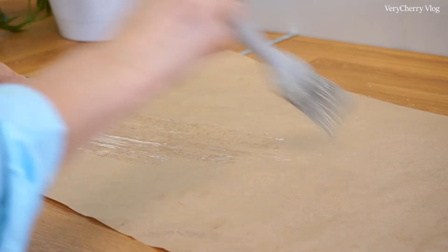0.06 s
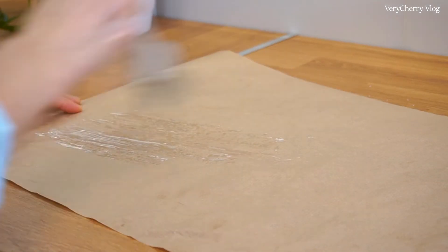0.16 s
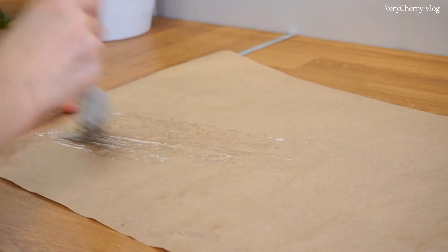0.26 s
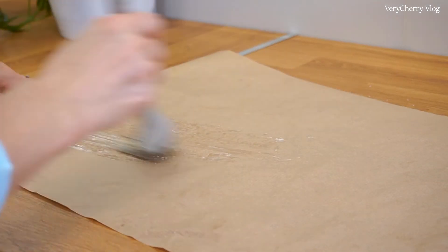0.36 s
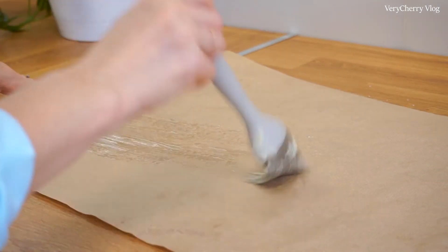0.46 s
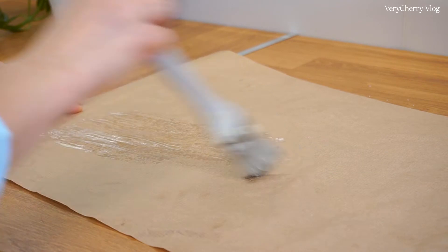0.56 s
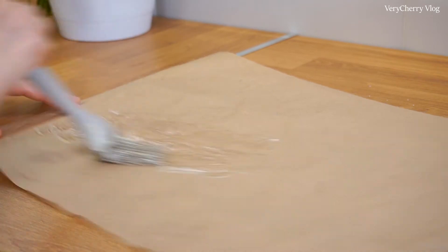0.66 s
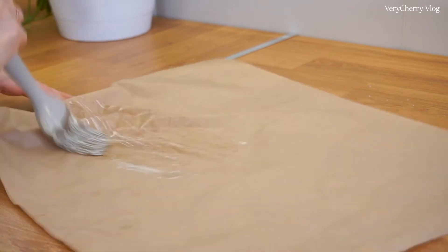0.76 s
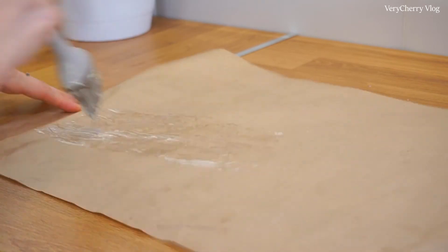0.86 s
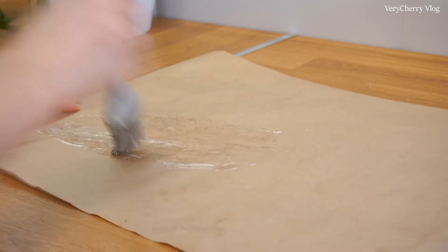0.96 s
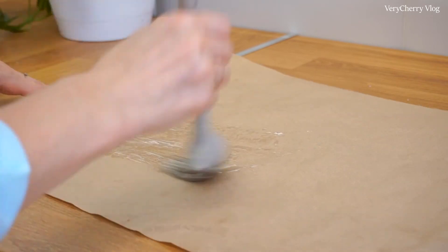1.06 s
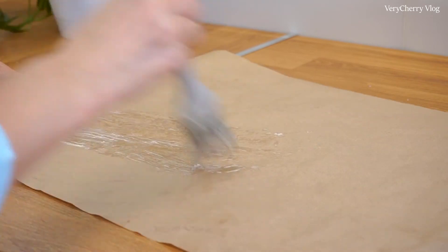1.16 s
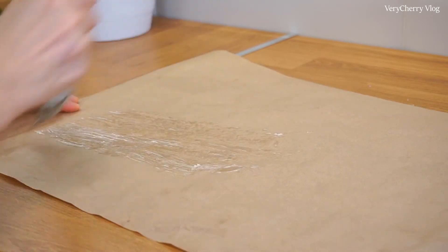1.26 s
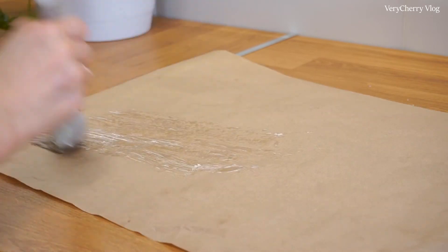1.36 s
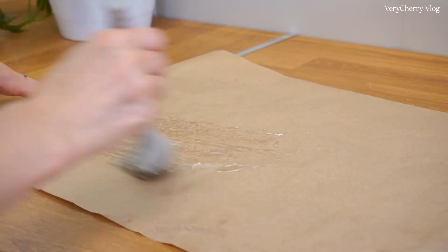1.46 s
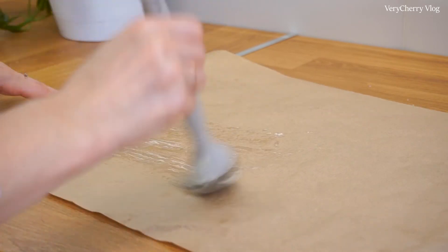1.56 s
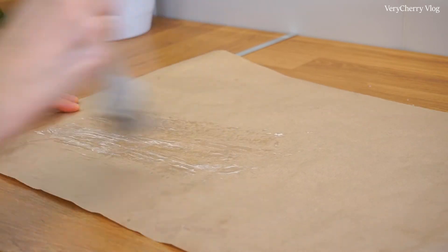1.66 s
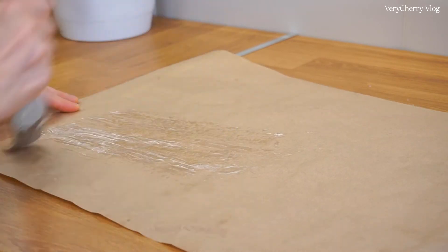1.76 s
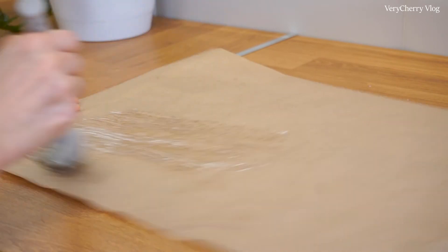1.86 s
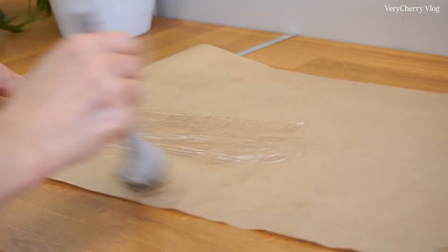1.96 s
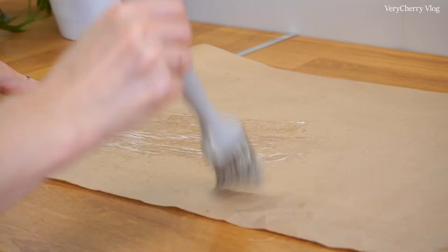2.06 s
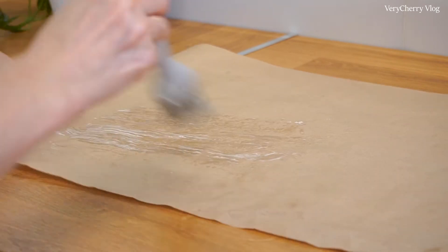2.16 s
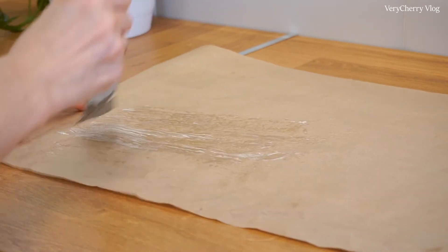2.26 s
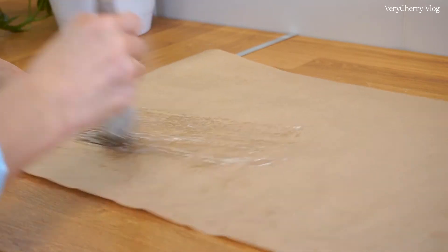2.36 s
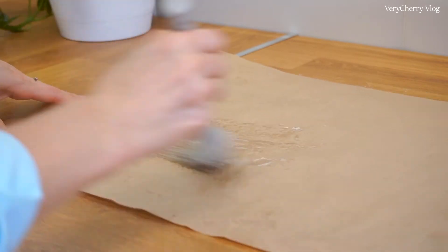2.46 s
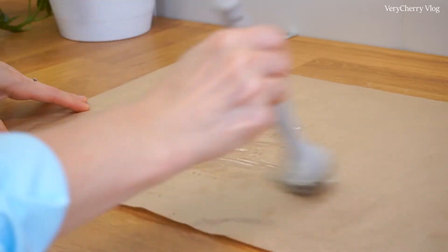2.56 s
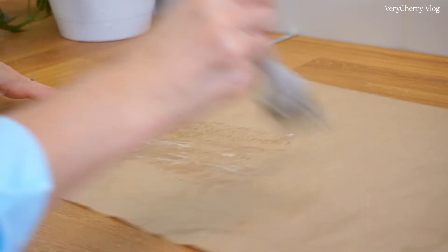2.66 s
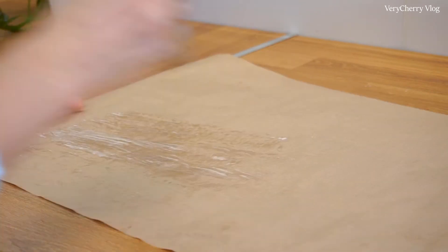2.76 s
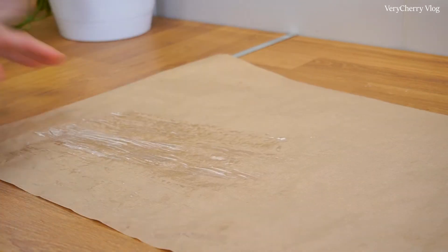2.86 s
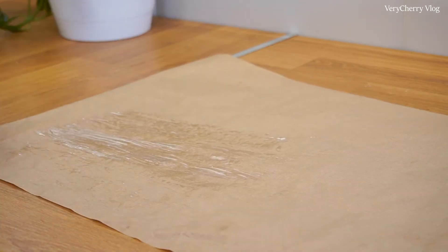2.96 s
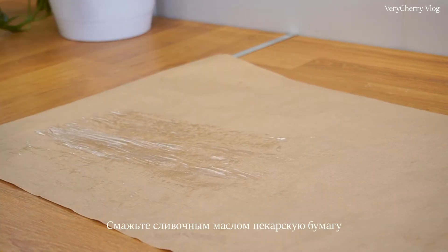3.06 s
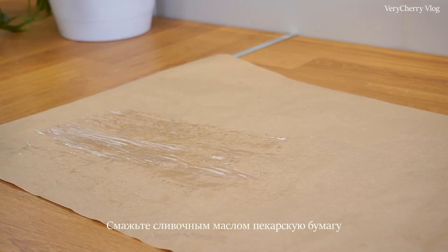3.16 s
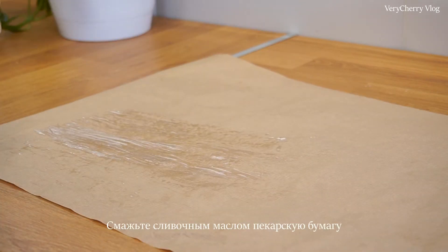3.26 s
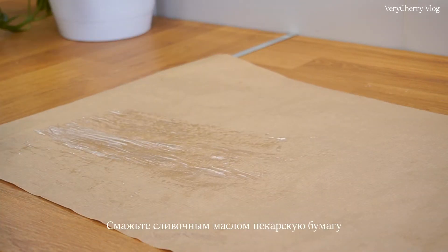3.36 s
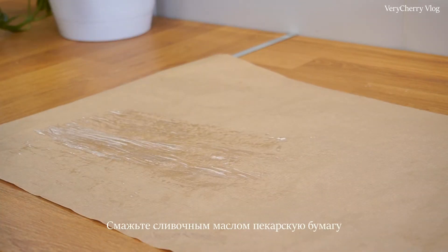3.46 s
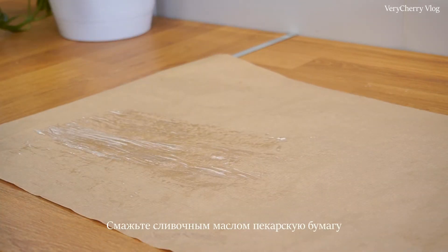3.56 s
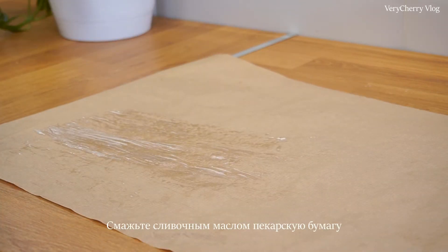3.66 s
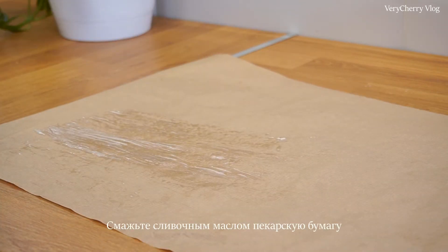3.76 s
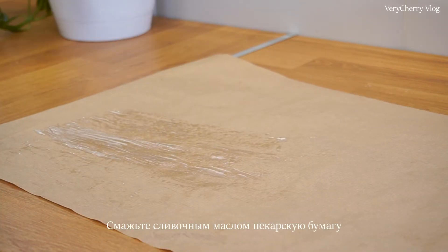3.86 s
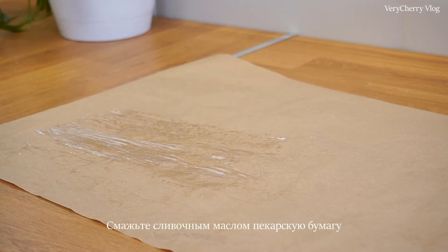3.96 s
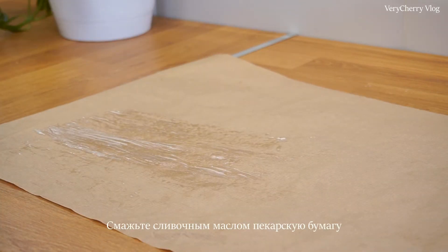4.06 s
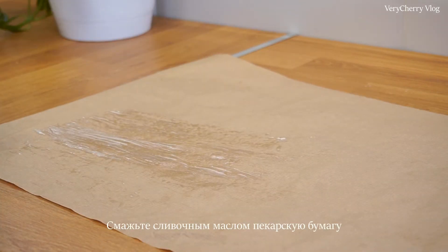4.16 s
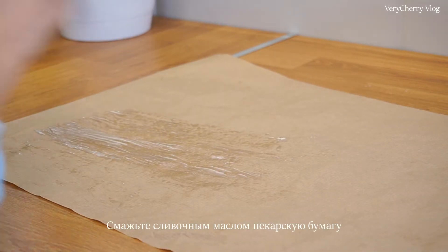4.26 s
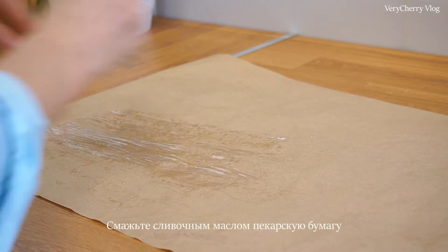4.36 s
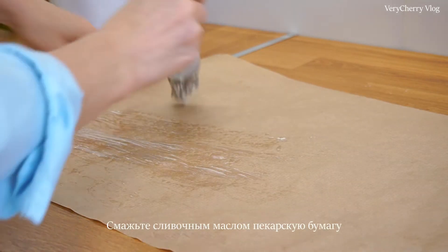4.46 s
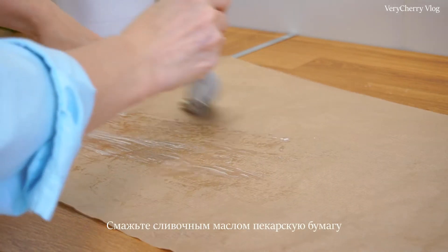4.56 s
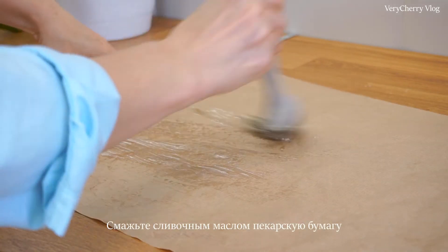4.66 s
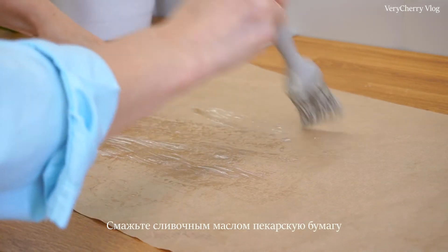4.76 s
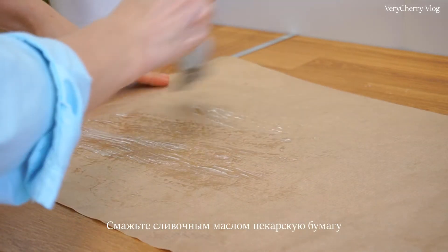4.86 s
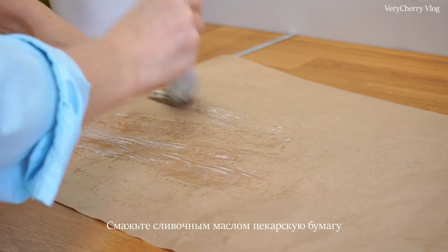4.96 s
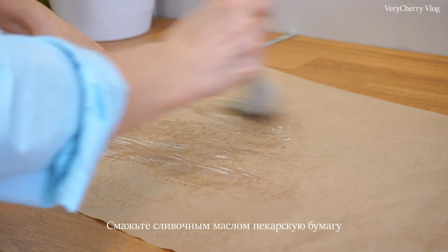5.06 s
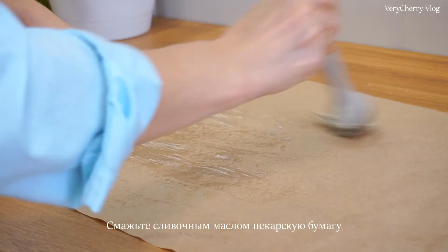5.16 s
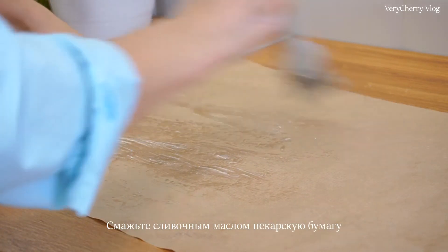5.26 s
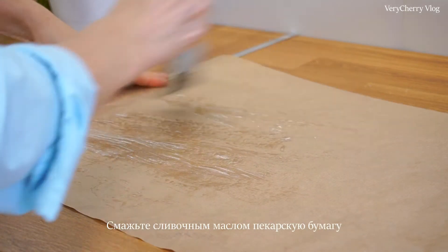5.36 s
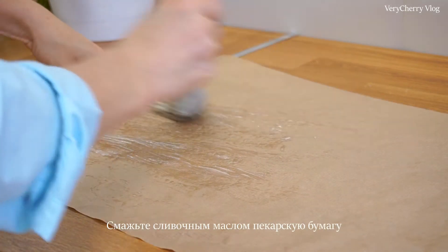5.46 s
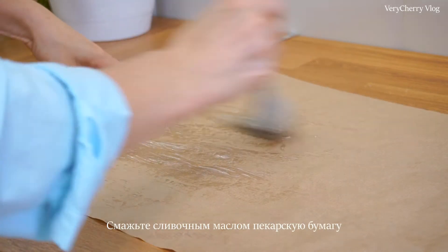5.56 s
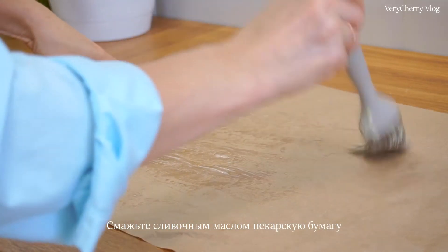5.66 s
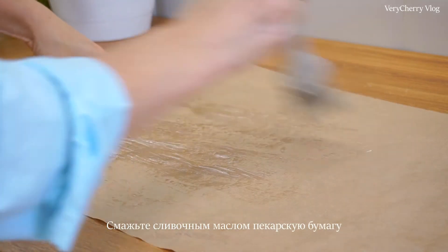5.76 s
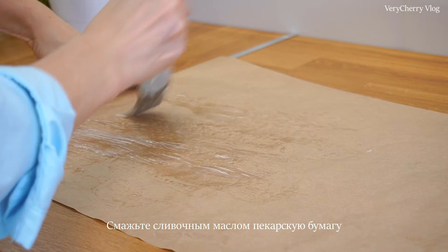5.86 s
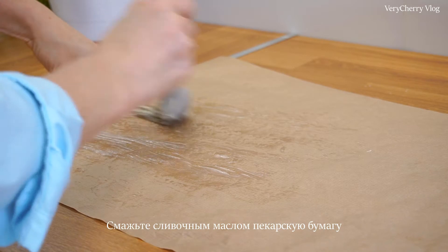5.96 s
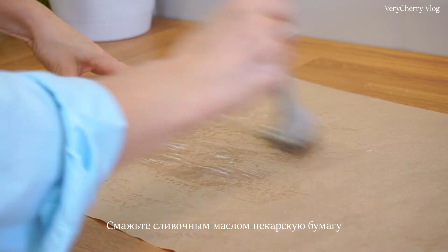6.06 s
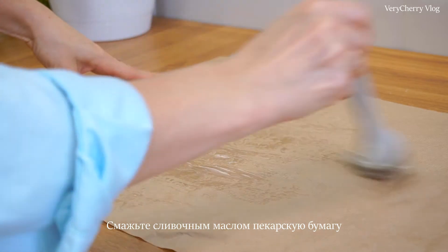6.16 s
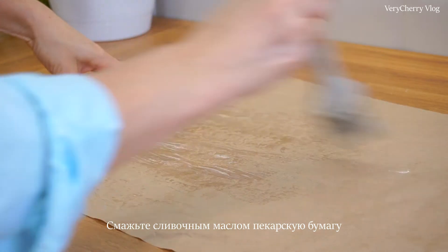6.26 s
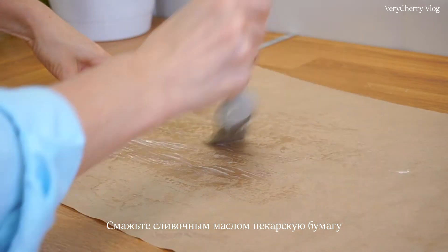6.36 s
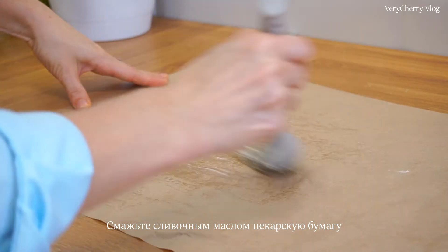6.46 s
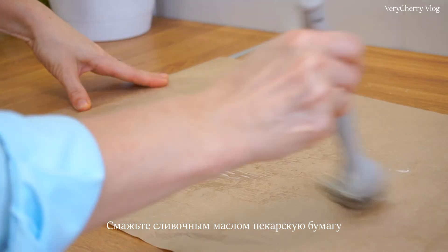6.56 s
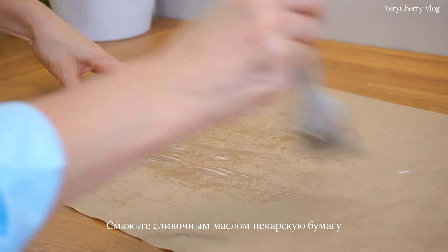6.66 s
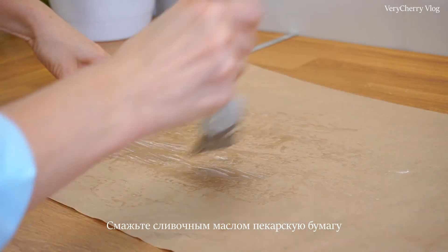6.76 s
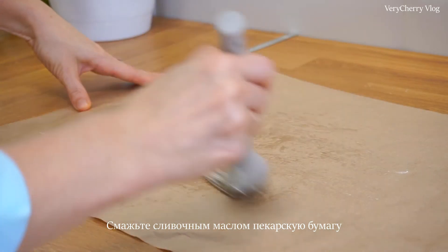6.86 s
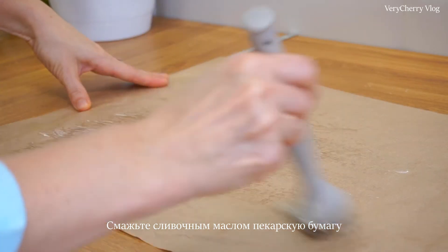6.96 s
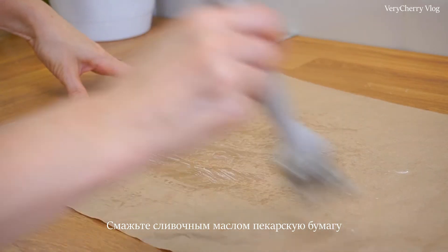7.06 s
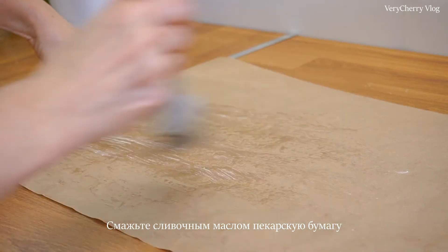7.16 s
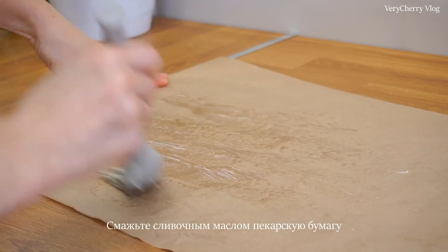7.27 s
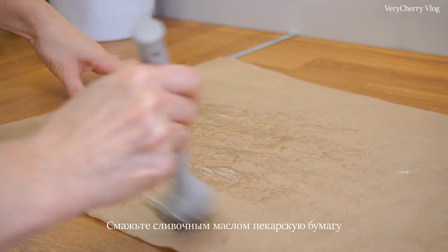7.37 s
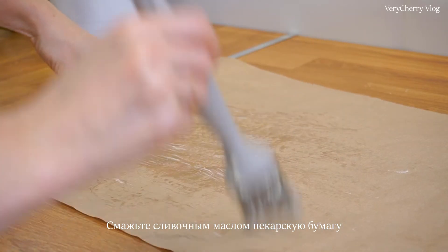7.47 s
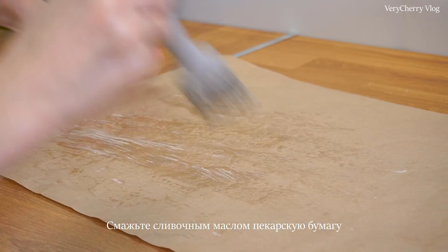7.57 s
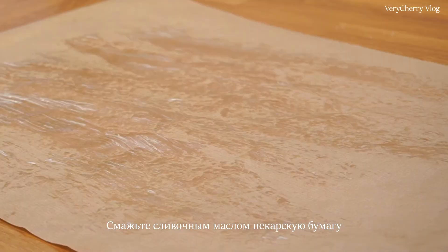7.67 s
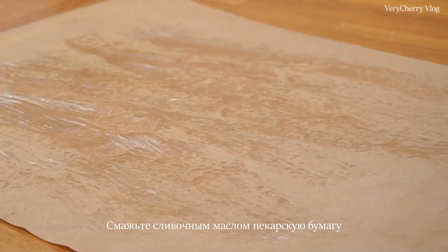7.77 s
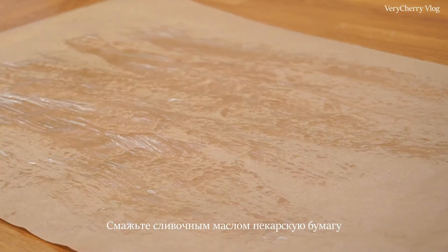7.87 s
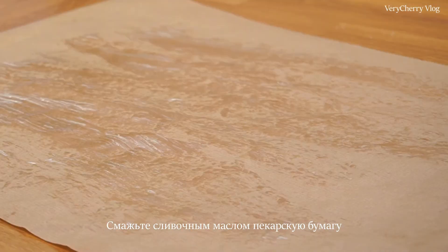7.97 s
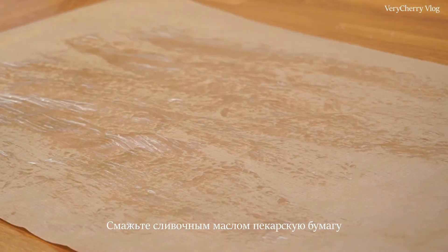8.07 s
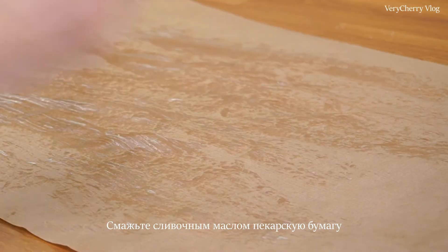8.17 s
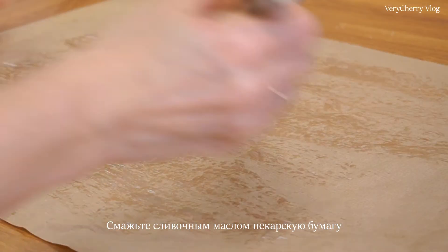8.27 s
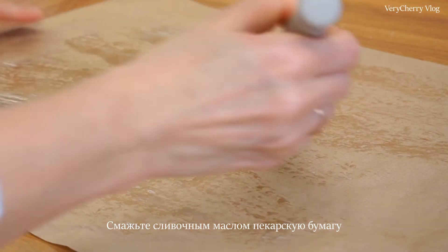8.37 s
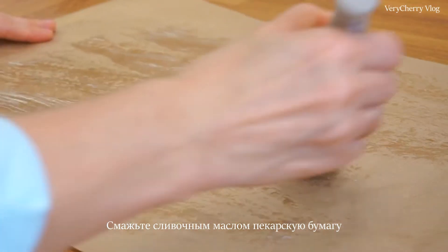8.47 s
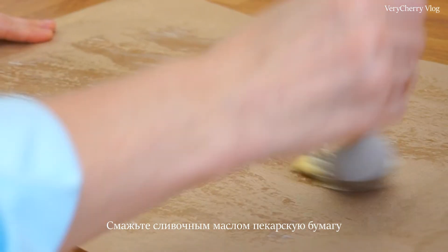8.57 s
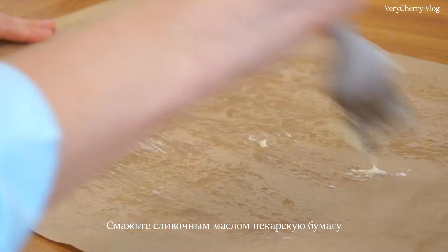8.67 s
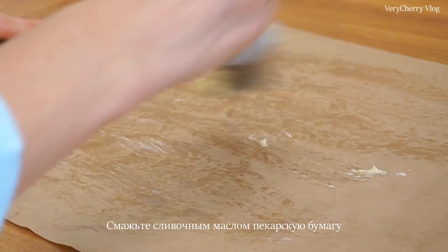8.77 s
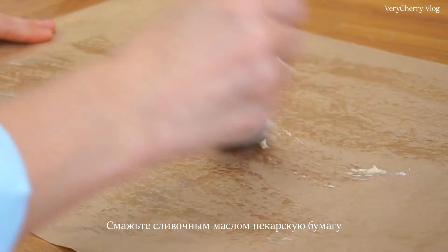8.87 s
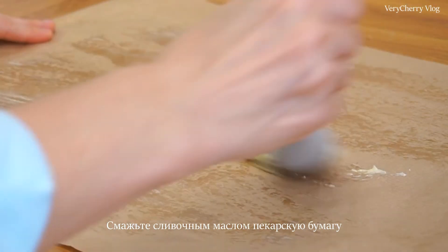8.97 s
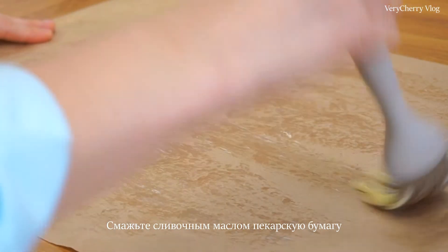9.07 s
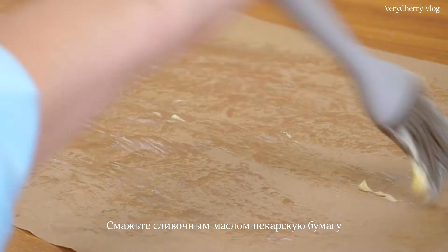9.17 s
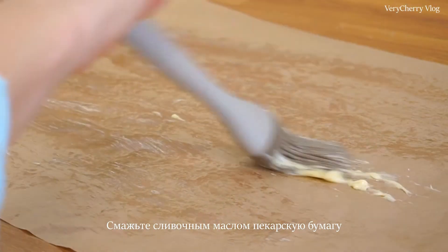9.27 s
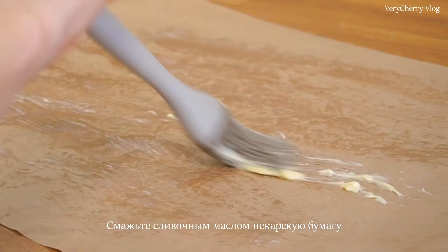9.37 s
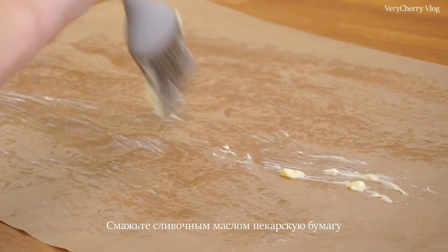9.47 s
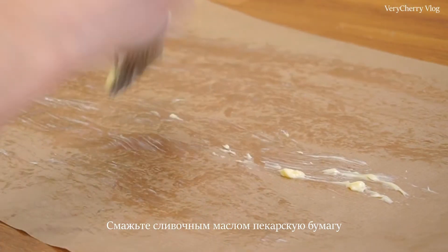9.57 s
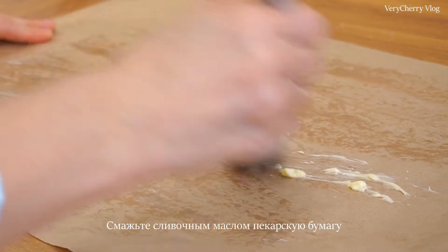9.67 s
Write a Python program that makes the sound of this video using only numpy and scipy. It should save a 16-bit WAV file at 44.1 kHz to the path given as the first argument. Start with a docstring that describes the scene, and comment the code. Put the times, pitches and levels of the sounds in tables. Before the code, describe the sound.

Close stereo pickup in a small kitchen: a soft brush scrapes butter over baking paper in quick uneven strokes, with sharp crisp paper snaps. After about three seconds it pauses; a faint hollow knock and a bright dish tap sound. Then the strokes resume, with soft wooden counter thumps. The room ringing cuts off abruptly near 7.7 seconds, and after a short quiet gap firmer scrapes return.

```python
"""Soft bristles scrape butter over baking paper: clumps of noise slips, shaped in level and tone by each push.
The paper snaps in sharp clicks with showers of smaller ones; near surfaces echo them and a small kitchen rings on.
The wooden counter thumps in two low modes; a dish tap and a hollow knock ring, a faint squeak glints.
Soft low bumps and a lumpy room tone lie under it all. At 7.68 s the ringing of the room stops short."""
import sys
import numpy as np
from scipy import signal
from scipy.fft import rfft, irfft, next_fast_len
from scipy.io import wavfile
from scipy.ndimage import uniform_filter1d, map_coordinates

SR = 44100
rng = np.random.default_rng(int(sys.argv[2]) if len(sys.argv) > 2 else 0)


def log_audio(samples):
    """Write samples as a 16-bit WAV file to the path given in sys.argv[1]."""
    # one column per channel
    frames = np.atleast_2d(samples).T
    # limit to full scale, then quantise
    limited = np.clip(frames, -1, 1)
    pcm = np.round(limited * 32767).astype(np.int16)
    wavfile.write(sys.argv[1], SR, pcm)


N = 428211


def amp(db):
    """dB to gain."""
    return 10 ** (np.asarray(db) / 20)


def unit(x):
    """x at rms 1."""
    return x / np.sqrt(np.mean(x ** 2) + 1e-20)


def along(points, hz):
    """Read (f/Hz, value) points on a log frequency axis."""
    f, value = np.transpose(points)
    return np.interp(np.log(hz + 1), np.log(f + 1), value)


def wobble(rate):
    """A smooth random curve, rate knots a second."""
    knots = rng.standard_normal(int(N * rate / SR) + 4)
    return map_coordinates(knots, [np.arange(N) * rate / SR])


def filtered(x, response):
    """x through a filter given as a function of frequency."""
    size = next_fast_len(N + SR // 2)
    gain = response(np.fft.rfftfreq(size, 1 / SR))
    return irfft(rfft(x, size) * gain, size)[..., :N]


def add(track, s, sound):
    """Mix a sound in at time s."""
    part = track[..., max(round(s * SR), 0):][..., :sound.shape[-1]]
    part += sound[..., :part.shape[-1]]


def ringing(modes, blur, rise):
    """Dying modes; a rattling contact blurs each one with a wandering phase."""
    t = np.arange(SR // 2) / SR
    wander = blur * np.cumsum(rng.standard_normal((len(modes), len(t))), axis=1)
    ring = np.zeros(len(t))
    for (hz, db, t60), phase in zip(modes, wander):
        ring += amp(db - 60 * t / t60) * np.sin(2 * np.pi * hz * t + phase)
    return ring * (1 - np.exp(-t / rise))


# spectrum of the room tone: (f/Hz, relative level/dB per Hz)
AIR_SPECTRUM = [(12, -55), (20, -12.5), (95, -5.5), (123, -7), (158, -6.5), (284, -7), (317, -11),
                (620, -13.5), (674, -13), (891, -15.5), (1510, -18), (1950, -19.5), (2180, -20.5),
                (15800, -31)]
# likeness of the room tone at left and right: (f/Hz, correlation)
AIR_LIKENESS = [(60, 0.87), (130, 0.93), (290, 0.61), (640, 0), (1410, -0.0), (3100, 0.042), (6820, 0.061),
                (15000, 0.041)]
AIR_DB, AIR_DRIFT_DB = -55.5, 1  # level and its slow drift


def room_tone(patchy_db=3):
    """Low lumpy hum of the house, alike at both ports, under unrelated hiss."""
    hz, t, z = signal.stft(rng.standard_normal((2, N)), SR, nperseg=2048)
    patches = uniform_filter1d(rng.standard_normal(z.shape[1:]), size=2, axis=0)
    patches = unit(uniform_filter1d(patches, size=12, axis=1))
    depth = 1 / (1 + hz / 400)[:, None]  # the patches are deepest in the bass
    pair = signal.istft(z * amp(patchy_db * depth * patches), SR, nperseg=2048)[1][:, :N]

    def mid_side_gain(hz):
        turn = np.arccos(np.clip(along(AIR_LIKENESS, hz), -1, 1)) / 2
        return amp(along(AIR_SPECTRUM, hz)) * [np.cos(turn), np.sin(turn)]

    mid, side = filtered(pair, mid_side_gain)
    return amp(AIR_DB + AIR_DRIFT_DB * wobble(1.46)) * unit(np.array([mid + side, mid - side]))


# near echoes: (mean delay t/s, level/dB)
NEAR_ECHOES = [(.0026, -13), (.0073, -5.5), (.0146, -8), (.022, -14)]
# decay of the kitchen's diffuse tail: (f/Hz, t60/s)
KITCHEN_DECAY = [(200, 0.39), (1500, 0.62), (5000, 0.47), (15000, 0.17)]


def kitchen(x, tail_db=-5):
    """Near surfaces echo once, their paths shifting as the brush travels; the diffuse tail changes too."""
    out = np.zeros((2, N))
    for delay, db in NEAR_ECHOES:
        for port in range(2):
            late = (delay + .00025 * wobble(14)) * SR
            out[port] += amp(db) * map_coordinates(x[port], [np.arange(N) - late])
    step = SR // 5  # a new tail every 0.2 s
    for start in range(0, N, step):
        hz, t, z = signal.stft(rng.standard_normal((2, SR * 3 // 5)), SR, nperseg=256)
        decay = amp(-60 * t / along(KITCHEN_DECAY, hz)[:, None])
        tail = signal.istft(z * decay, SR, nperseg=256)[1]
        tail = tail / np.linalg.norm(tail[0])
        piece = x[:, start:start + step].mean(0)[None]
        wet = signal.fftconvolve(piece, tail, axes=1)
        wet += 0.12 * wet[::-1]  # the ports are close enough to share part of the tail
        add(out, start / SR + 0.0036, amp(tail_db) * wet)
    return out


# soft low bumps: (t/s, level/dB, f/Hz)
LOW_BUMPS = [(0.029, -73, 70.0), (0.329, -47.5, 48.4), (1.599, -56.5, 58.7), (2.299, -57, 69.5),
             (7.799, -55.5, 45.8), (9.549, -64, 47.6)]


def bumps():
    """Low sines swell softly and die away, one swell each."""
    out, t = np.zeros(N), np.arange(SR // 3) / SR
    for s, db, hz in LOW_BUMPS:
        swell = t / 0.033 * np.exp(1 - t / 0.028)
        add(out, s, amp(db) * swell * np.sin(2 * np.pi * hz * t))
    return out


# thumps of the worktop: (t/s, level/dB, upper mode level/dB relative to the lower)
COUNTER_THUMPS = [(2.306, -52, -8), (5.025, -55, -17), (5.142, -47, -5.5), (5.635, -48.5, -3.5),
                  (8.411, -60, 6.5), (8.903, -48, -7), (9.679, -52, -15)]
# lower and upper mode of the worktop: (f/Hz, t60/s)
COUNTER_MODES = [(90, 0.48), (340, 0.48)]


def counter():
    """Firm strokes push the worktop softly into its low modes."""
    out, t = np.zeros(N), np.arange(SR // 2) / SR
    (low_hz, low_t60), (high_hz, high_t60) = COUNTER_MODES
    onset = 1 - np.exp(-t / 0.0029)
    for s, db, upper_db in COUNTER_THUMPS:
        low = amp(-60 * t / low_t60) * np.sin(2 * np.pi * low_hz * t)
        high = amp(upper_db - 60 * t / high_t60) * np.sin(2 * np.pi * high_hz * t)
        add(out, s, amp(db) * onset * (low + high))
    return out


# the tap: (t/s, level/dB)
DISH_TAP = (3.524, -31.5)
# modes of the dish: (f/Hz, level/dB, t60/s)
DISH_MODES = [(1400, -12, .02), (2200, -13, .025), (3235, -11, .07), (3360, -12, .06), (5900, -9, .04),
              (8520, -9, .04)]


def dish_tap():
    """A tap sets the short bright modes of a dish ringing, blurred by the contact."""
    out = np.zeros(N)
    s, db = DISH_TAP
    add(out, s, amp(db) * ringing(DISH_MODES, blur=.14, rise=.0005))
    return out


# the knock: (t/s, level/dB)
HOLLOW_KNOCK = (3.222, -43)
# modes of the hollow body: (f/Hz, level/dB, t60/s)
HOLLOW_MODES = [(127, -8.5, 0.19), (253, -8, 0.16), (362, -1.5, 0.22), (397, 0.5, 0.1), (580, -10, 0.1),
                (687, -3.5, 0.089), (1065, -6, 0.066), (1400, -4, 0.081)]


def knock():
    """A hollow knock rings lower modes with a softer onset."""
    out = np.zeros(N)
    s, db = HOLLOW_KNOCK
    add(out, s, amp(db) * ringing(HOLLOW_MODES, blur=.07, rise=.006))
    return out


# swell of the squeak: (t/s, level/dB)
SQUEAK_SWELL = [(7.87, -85), (7.9, -73), (7.933, -64), (7.95, -74), (8.05, -83)]
# its harmonics: (multiple of the fundamental, level/dB)
SQUEAK_HARMONICS = [(1, -13), (2, 0), (3, -6), (4, -9)]
SQUEAK_HZ = 1848


def squeak():
    """A thin harmonic tone whose pitch trembles and whose harmonics flicker."""
    t = np.arange(N) / SR
    s, level = np.transpose(SQUEAK_SWELL)
    db = np.interp(t, s, level)
    phase = 2 * np.pi * np.cumsum(SQUEAK_HZ * (1 + .003 * wobble(60))) / SR
    tone = np.zeros(N)
    for multiple, harmonic_db in SQUEAK_HARMONICS:
        tone += amp(db + harmonic_db + 3.1 * wobble(40)) * np.sin(multiple * phase)
    return tone * ((t > s[0]) & (t < s[-1]))


def push(row, t):
    """Level of one scrape in dB at times t: rise, hold, fall."""
    s, db, rise, hold, fall = row[:5]
    before = np.clip(s - t, 0, None)
    after = np.clip(t - s - hold, 0, None)
    return db - 20 * before / max(rise, 1e-3) - 20 * after / max(fall, 1e-3)


# chance snaps: slots a second, level at a -39 dB scrape, usual pitch
CRACKLE_PER_S, CRACKLE_DB, CRACKLE_HZ = 15, -36, 6000
CRACKLE_GROWS = 0.77  # dB more for each dB of scrape over -40; one for one below


def crackle():
    """Small snaps at chance times over the first 8 s, as strong as the scrape allows."""
    s = (np.arange(120) + rng.random(120)) / CRACKLE_PER_S
    size, pitch, pan = rng.standard_normal((3, len(s)))
    scrape_db = np.max([push(row, s) for row in SCRAPES], axis=0)
    growth = np.where(scrape_db > -40, CRACKLE_GROWS, 1)
    db = CRACKLE_DB + growth * (scrape_db + 39) + 3 * size
    hz = np.clip(CRACKLE_HZ * np.exp(.35 * pitch), 2e3, 13e3)
    return [row for row in zip(s, db, hz, 4 * pan) if row[0] < N / SR]


# the clear paper snaps: (t/s, level/dB, centre f/Hz, left over right level/dB)
PAPER_SNAPS = [(0.018, -26.5, 6730, -2.5), (0.164, -34.5, 5600, 0), (0.331, -25.5, 7080, 2),
               (0.448, -28, 6260, -2.0), (0.6337, -29, 4890, 1.5), (0.6507, -15, 7930, 0),
               (0.6693, -24, 6240, -7), (0.7242, -17, 4910, 1), (0.825, -22, 4680, 0.0),
               (0.884, -18, 5190, -1.0), (1.067, -15, 6260, -0.5), (1.3476, -30.5, 4420, -1),
               (1.4739, -18.5, 6000, -4), (1.4797, -15, 6680, -0.5), (1.5424, -19.5, 7600, -1.0),
               (1.6566, -27, 5630, 0.0), (1.801, -31.5, 7200, 2), (1.837, -26, 7320, -1),
               (1.8628, -17.5, 9370, -2.0), (1.9113, -25, 5950, 7), (2.0486, -17, 6860, -1.5),
               (2.069, -22, 6870, -1.5), (2.138, -29.5, 4770, -7), (2.2014, -14.5, 9560, 1),
               (2.2845, -15, 7220, 1), (2.4896, -27, 5960, -3), (2.536, -21, 6410, 1),
               (2.819, -24.5, 9140, -3), (3.0783, -30, 3550, 1), (3.495, -40, 5290, -3),
               (3.5231, -17, 8000, -2), (4.5215, -25.5, 2570, 4), (4.576, -17, 4720, -1.0),
               (4.706, -20, 10200, -5), (4.7434, -23, 3340, 2), (4.9641, -18.5, 7440, -0.5),
               (5.0717, -23.5, 5880, -5), (5.0948, -21, 9230, -2.5), (5.108, -23, 9500, -4),
               (5.123, -28, 3390, -3.0), (5.5048, -21, 12200, -3), (5.5705, -23, 5700, -3.0),
               (5.611, -26, 9100, -3.0), (5.6306, -15, 9750, -1.0), (5.7094, -25, 5030, -6),
               (5.925, -27, 6140, 0.0), (5.9825, -26, 6900, -2), (6.0072, -26, 6560, -0.5),
               (6.057, -18, 7650, -1.5), (6.1054, -28, 7650, -2.5), (6.1509, -24, 13500, -1.5),
               (6.323, -32, 7500, 0), (6.3959, -34, 2900, -2.0), (6.4074, -29, 5290, -1.5),
               (6.4366, -29.5, 3940, -5), (6.451, -19, 7900, -2), (6.535, -20.5, 4160, -3.0),
               (6.555, -14, 8900, -2.5), (6.6596, -20.5, 8760, -7), (6.673, -22.5, 8650, -5),
               (6.7403, -19, 7600, -1.5), (6.8843, -32, 7930, -0.5), (6.9187, -29, 7100, -9),
               (6.963, -24, 8470, -1.0), (7.0215, -20, 7120, -2.0), (7.0369, -23, 4470, -2.0),
               (7.169, -26.5, 6840, -4), (7.2634, -29, 8600, -1.0), (7.3054, -22.5, 5460, 0),
               (7.3302, -18.5, 8120, -0.5), (7.3944, -18.5, 6560, 0), (7.42, -23, 6350, 6),
               (7.4324, -17, 6760, 1), (7.8864, -44, 3660, 0.0), (8.4205, -18, 4370, 2),
               (8.4352, -17, 5440, 0.0), (8.5265, -26.5, 3420, -1.5), (8.664, -27, 10600, -2.5),
               (8.7273, -24, 9400, -3.5), (8.8594, -25, 4420, -2), (8.8657, -28, 4030, -1.0),
               (8.9416, -17.5, 3940, -2), (8.954, -15, 8600, -3), (9.0259, -27.5, 3810, -2.5),
               (9.047, -23.5, 9630, -6), (9.1272, -24.5, 7530, -4), (9.1546, -27.5, 8730, -3.5),
               (9.2539, -38, 9300, -1.5), (9.267, -25, 7990, -7), (9.356, -21.5, 4890, -1.5),
               (9.653, -19.5, 8120, -3), (9.6749, -23, 5520, -3.0)]
SHOWER_DB = -14.5  # gain of the smaller clicks after a snap


def snaps():
    """A crease lets go: one sharp click around its own pitch, then a short shower of smaller ones."""
    out, t = np.zeros((2, N)), np.arange(SR // 10) / SR
    for s, db, hz, pan_db in list(PAPER_SNAPS) + crackle():
        # the two ports hear the crease from different sides
        pitch = hz * rng.uniform(.85, 1.15, (2, 1))
        single = np.exp(-((t - .001) * hz / .6) ** 2) * np.sin(2 * np.pi * pitch * (t - .001))
        click = .7 * single
        for lag in rng.integers(8, 60, size=3):  # it tears in a few steps, lags in samples
            click = click + rng.uniform(-.6, .6) * np.roll(single, lag, axis=1)
        envelope = amp(-60 * t / 0.058) * (1 - np.exp(-t / 0.00021))
        shower = envelope * rng.standard_normal((2, len(t))) * rng.exponential(1.0, len(t))
        band = [hz / SR, min(4 * hz / SR, .75)]  # half to twice the pitch, capped
        shower = signal.lfilter(*signal.butter(2, band, "bandpass"), shower)
        pan = amp([[pan_db / 2], [-pan_db / 2]])
        add(out, s, amp(db) * pan * (click + amp(SHOWER_DB) * shower))
    return out


def slips(rate, centre_hz):
    """Bristles stick and slip near one pitch, as mid and side; the finest are the most uneven."""
    spread_db = 3.5 + centre_hz / 3000
    slipping = rng.random(N) < rate / SR
    size = slipping * amp(spread_db * np.clip(rng.standard_normal(N), -3, 2.4))
    pair = size * rng.standard_normal((2, N))
    return filtered(pair, lambda hz: np.exp(-np.log2(hz / centre_hz + 1e-9) ** 2 / .5))


# spectrum of scraped paper: (f/Hz, relative level/dB per Hz)
PAPER_SPECTRUM = [(150, -39), (250, -7.5), (420, -10), (509, -5.5), (745, -7.5), (1070, -6.5), (1170, -6),
                  (1770, -3), (2030, -0.5), (2300, -1), (4830, 4), (11700, -4), (15700, -12.5)]
# side gain of the bristles: (f/Hz, level/dB)
SIDE_SPREAD = [(300, -20), (1000, -32), (4000, -6), (15000, -3)]
# pushes of the bristles: (full from t/s, level/dB, rise/s per 20 dB, hold/s, fall/s per 20 dB,
# treble of light fast bristles level/dB, low rustle of pressed paper level/dB);
# a rise or fall under 1 ms, or negative, plays as 1 ms
SCRAPES = [(0, -47.5, .05, 0.067, 0.09, 5.5, 2), (0.354, -49.5, 0.07, 0.099, .1, 4, 4.5),
           (0.48, -40.5, 0.09, .005, 0.09, 1.5, 1.5), (0.644, -46.5, 0.07, 0.019, 0, 6.5, 5.5),
           (0.678, -32.5, 0.02, .17, 0.07, 2, -0.5), (0.884, -31, 0.04, 0.0045, .13, 2, -2.5),
           (1.067, -37, -0.01, 0.0083, 0.02, 1, 0.5), (1.114, -46, -0.4, 0.0055, 0.11, 5, -1),
           (1.377, -39.5, .04, .005, 0.03, 7, 0), (1.481, -41, 0.1, .005, 0.22, 2.5, 3),
           (1.794, -46.5, -0.07, 0.041, 0.23, 3, 4.5), (1.933, -35.5, 0.05, .005, 0.37, 7, 0.5),
           (2.193, -47.5, -0.25, 0.015, 0.07, 9, -7), (2.282, -32.5, -0.0862, 0.0039, 0.12, 2.5, 0),
           (2.32, -42, -0.03, 0.056, 0.28, 5.5, 1), (2.537, -42, -0.12, 0.048, 0.2, 6, 3.5),
           (2.674, -43, -0.32, 0.097, 0.05, 6.5, -13), (2.802, -43, 0, 0.0098, 0.09, 7, 3),
           (3.08, -43.5, .03, 0.0027, 0.02, -1, 1), (3.15, -60, 0.5, 0.11, 0.1, -17, 8.5),
           (4.415, -60.5, 0.13, .11, 1.7, -2, 11.5), (3.48, -61.5, -0.4, 0.052, -0.7, -4, 8),
           (4.527, -45, 0.03, 0.0091, 0.14, 6, 2.5), (4.546, -35, 0.04, 0.0046, 0.08, -5, 0),
           (4.575, -35.5, 0.03, 0.0057, 0.11, 3, -1.5), (4.673, -44.5, 0.1, 0.088, .1, 6.5, 3.5),
           (4.957, -43, -0.01, 0.028, 0.02, 5.5, 4.5), (5.148, -36.5, 0.1066, 0.012, 0.13, 7, 2.5),
           (5.508, -43, 0.02, 0.035, 0.16, 3.5, 0), (5.568, -46.5, .005, .005, .07, 7, 3),
           (5.633, -36.5, .04, 0.0024, .05, 4.5, 3.5), (5.705, -47, 0.1, .005, 0.07, 5.5, 3.5),
           (5.919, -53.5, .01, 0.15, 0, -1, 3), (6.049, -45, 0.02, 0.15, 0.11, 5, 3.5),
           (6.389, -48, 0.02, 0.015, .04, 3, 3), (6.442, -46.5, .003, 0.042, -0.08, 1, 5),
           (6.535, -40.5, .003, .012, 0.01, 10.5, 3), (6.564, -40, 0.06, 0.036, 0.1, 5.5, 2.5),
           (6.667, -40.5, .015, .003, -0.01, 11, 4), (6.742, -47, -0.1, 0.013, 0.07, 9.5, -17),
           (6.807, -57, -0.8, .08, .1, 2, 3), (7.013, -44.5, 0.25, 0.0044, 0.06, 5, 5),
           (7.107, -49, 0, .005, -0.14, 4, 1), (7.17, -55.5, .003, .005, -0.4, -1, -8),
           (7.26, -52.5, .006, .02, -0.16, 0, 7), (7.315, -46, 0.06, 0.052, -0.06, 1, 2),
           (7.433, -36.5, 0.14, 0.0069, 0.074, 5, 1), (7.547, -46, .2, 0.013, 0.1, 1, 3.5),
           (7.86, -67, -6, 0.23, 4, 0, 8), (8.322, -59.5, .1, 0.034, .2, -11, 9.5),
           (8.417, -35, 0.01, 0.029, 0.0751, 4, 0.5), (8.596, -53.5, 0.28, 0.1, -0.5, 2.5, 4),
           (8.729, -58, .003, 0.0091, 0.14, 8, -14), (8.86, -39.5, .005, 0.034, 0.09, 1.5, 1.5),
           (8.961, -41, 0.03, .045, 0.24, 0.5, 0), (9.27, -47.5, -0.13, .01, 0, 8, 4),
           (9.285, -42.5, -0.04, 0.022, 0.11, 6, 0), (9.355, -39, -0.02, 0.018, .07, 0, 1.5),
           (9.442, -45.5, -0.12, 0.029, -0.12, 3, 4), (9.645, -39, -0.07, .06, -2, -1, 0)]
# hard pushes rasp here: centre, width, dB more for each dB of scrape over -40
RASP_HZ, RASP_OCT, RASP_GROWS = 2340, 0.47, 0.31


def bristles():
    """Coarse and fine bristles slip each on their own, in clumps; speed brightens, pressure deepens."""
    bands = np.zeros((2, N))
    for hz in 300 * 2. ** np.arange(0, 6, .64):
        bands += unit(slips(1500 + hz / 2, hz)) * amp(2 * wobble(60)) * np.sqrt(hz)
    clumps = bands * amp(1.2 * wobble(45))
    pair = unit(filtered(clumps, lambda hz: amp(along(PAPER_SPECTRUM, hz))))

    hz, t, z = signal.stft(pair, SR, nperseg=256)
    treble = np.clip(np.log(hz / 5000 + 1e-9) / np.log(2.2), 0, 1.3)[:, None]
    rustle = np.clip(-np.log(hz / 3000 + 1e-9) / np.log(2.2), 0, 1.3)[:, None]
    rasp = RASP_GROWS * np.exp(-(np.log2(hz / RASP_HZ + 1e-9) / RASP_OCT) ** 2)[:, None]
    power = 0
    for row in SCRAPES:
        db, treble_db, rustle_db = row[1], row[5], row[6]
        tone_db = rasp * max(db + 40, 0) + treble * treble_db + rustle * rustle_db
        power = power + amp(push(row, t) + tone_db) ** 2
    mid, side = signal.istft(z * np.sqrt(power), SR, nperseg=256)[1][:, :N]
    side = filtered(side, lambda hz: amp(along(SIDE_SPREAD, hz)))
    return np.array([mid + side, mid - side]) * amp([[-2.2], [-.8]])  # left and right trim


HUSH = 7.68  # s, the ringing of the room stops short


def scene():
    """Close sounds ring in the kitchen over thumps, bumps and room tone."""
    near = bristles() + snaps() + dish_tap() + knock() + squeak()
    t = np.arange(N) / SR
    before = np.arange(N) < HUSH * SR
    fade = np.clip((HUSH - t) / 0.006, 0, 1)
    early, late = near * before, near * ~before
    close = fade * (early + kitchen(early)) + late + kitchen(late)
    return close + counter() + bumps() + room_tone()


TOP_HZ = 15750


def record(dry):
    """A sharp band limit: nothing from TOP_HZ up is kept."""
    return filtered(dry, lambda hz: hz < TOP_HZ)


dry = scene()
out = record(dry)
log_audio(out)
```